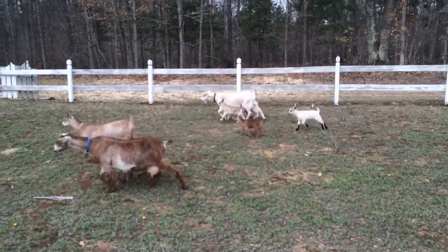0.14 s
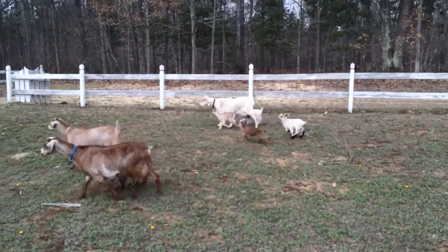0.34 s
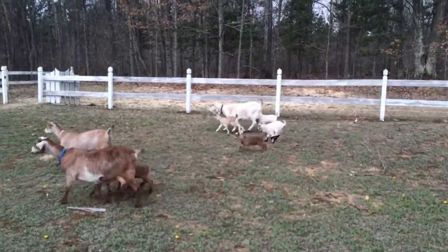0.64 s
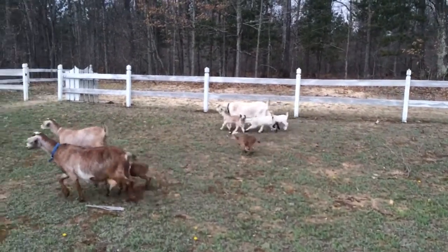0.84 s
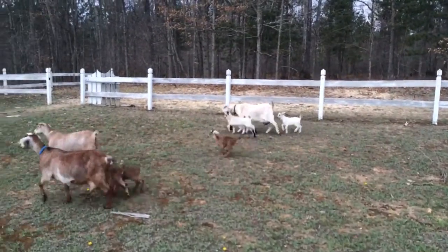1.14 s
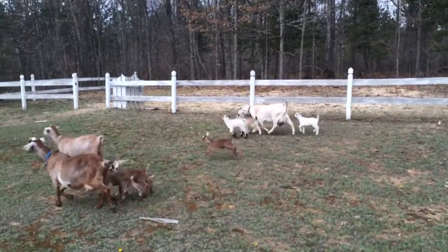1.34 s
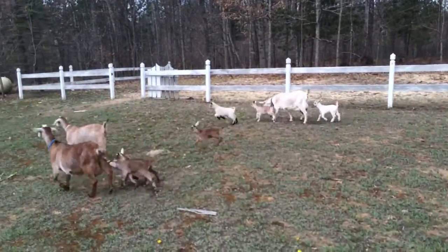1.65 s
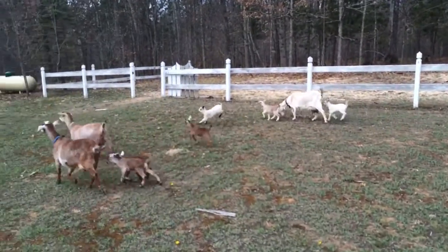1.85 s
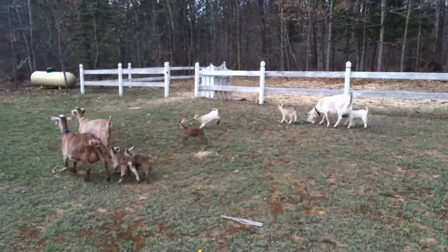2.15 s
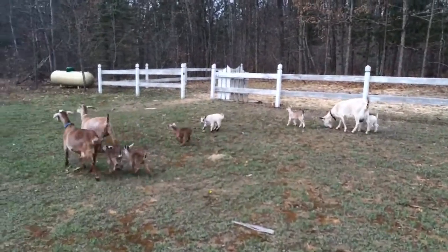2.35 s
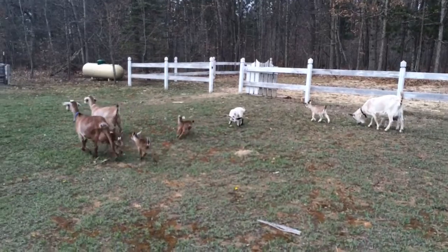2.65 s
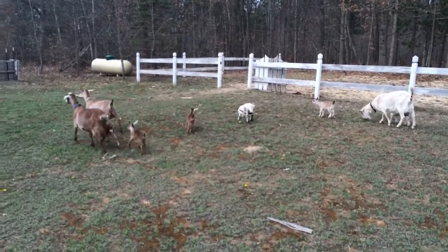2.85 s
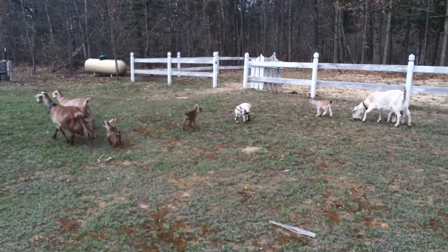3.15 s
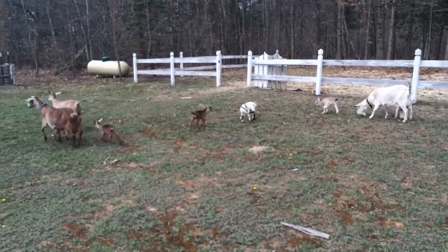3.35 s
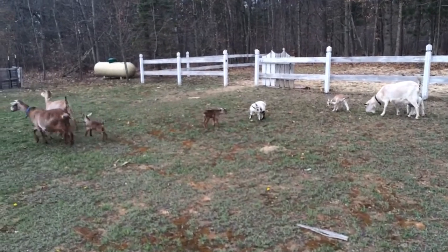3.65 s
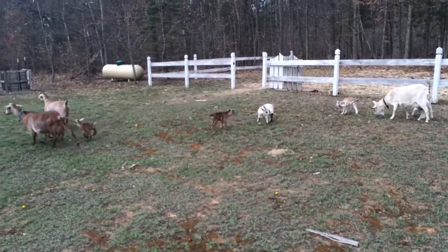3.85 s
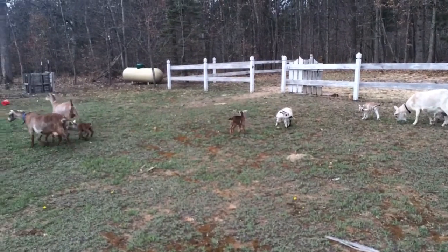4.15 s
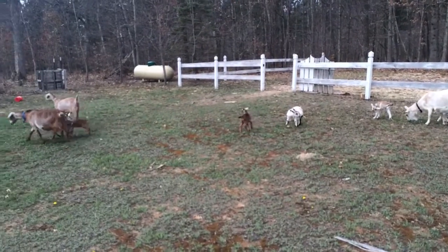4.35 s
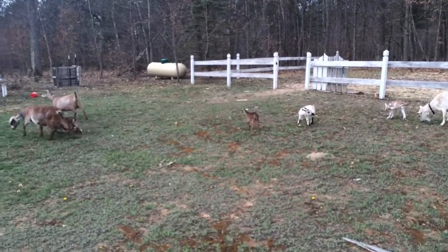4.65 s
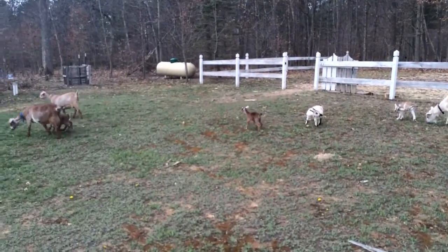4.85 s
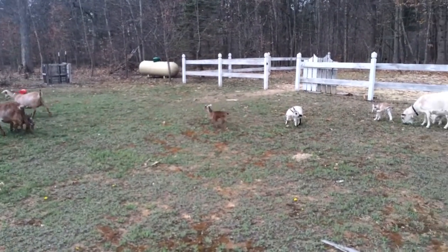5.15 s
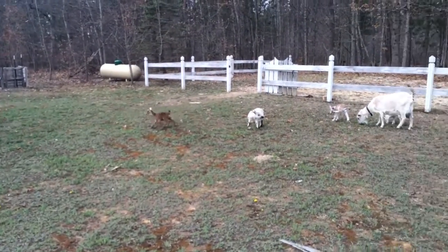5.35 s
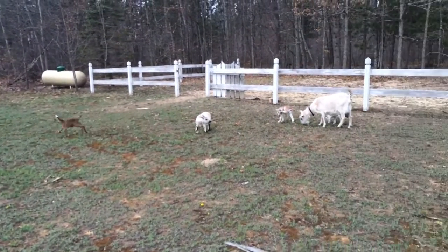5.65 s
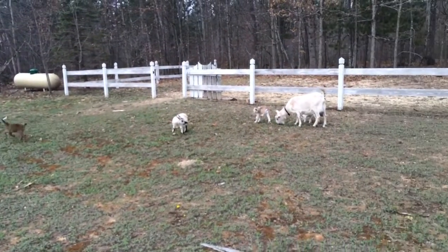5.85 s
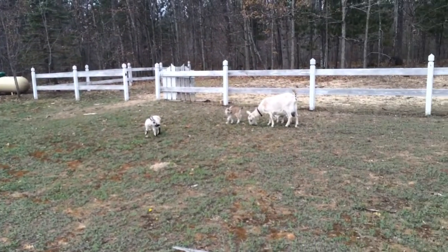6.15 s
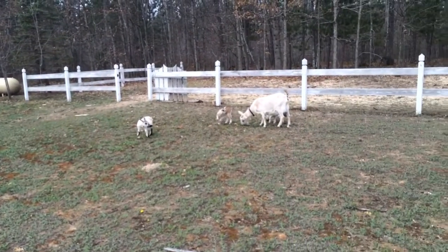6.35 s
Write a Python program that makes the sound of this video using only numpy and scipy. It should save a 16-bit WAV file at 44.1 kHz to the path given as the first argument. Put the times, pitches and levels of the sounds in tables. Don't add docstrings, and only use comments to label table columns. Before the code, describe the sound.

In an open grassy yard by a fence and bare woods, one goat kid gives seven nasal, buzzing bleats, from hoarse single syllables to a long fast train of eight. Other kids answer softly near the start and middle. Wind thumps and rumbles on the handheld microphone mostly in the first two and a half seconds, then calms. Hooves tick in dry grass over faint hiss; the trees return a thin echo.

```python
import sys
import numpy as np
from scipy import signal
from scipy.io import wavfile
from scipy.ndimage import uniform_filter1d

SR = 44100
rng = np.random.default_rng(int(sys.argv[2]) if len(sys.argv) > 2 else 0)


def volts_from_decibels(level):
    exponent = np.asarray(level, float) / 20
    return 10 ** exponent


def bounce(signal):
    frames = np.transpose(np.atleast_2d(signal))
    limited = np.clip(frames, -1, 1)
    pcm = np.round(limited * 32767).astype(np.int16)
    wavfile.write(sys.argv[1], SR, pcm)


N = 286209

# f/Hz, level/dB per Hz
AIR_SPECTRUM = [(40, -13.5), (70, -3.5), (150, -12), (600, -10.5), (2000, -21.5), (7000, -27),
                (13000, -33.5), (15500, -33)]
# t/s, rumble level/dB
WIND_LEVEL = [(0, -53), (.27, -57), (.42, -44.5), (.53, -61), (.85, -48.5), (1.0, -48), (1.12, -41),
              (1.45, -35.5), (1.72, -40), (1.92, -46.5), (2.23, -50.5), (2.5, -45), (2.98, -56.5),
              (3.2, -69), (4.02, -58), (4.2, -69.5), (6.2, -64), (6.4, -42.5)]
# f/Hz, level/dB per Hz
RUMBLE_SPECTRUM = [(20, -31.5), (38, -0.5), (70, 15), (120, -4.5), (180, 0), (300, -36.5), (600, -81.5)]
# f/Hz, level/dB per Hz
FLUTTER_SPECTRUM = [(80, -70), (150, 3), (220, 1), (500, -8.5), (800, -22.5), (1200, -38.5), (2500, -51)]
# t/s, peak level/dB, swing f/Hz
EDDIES = [(0.198, -31, 150), (0.36, -32, 95), (0.591, -17, 136), (0.7, -24, 128), (0.76, -25, 112),
          (0.921, -27, 112), (1.062, -19, 99), (1.094, -28, 250), (1.151, -25, 310), (1.174, -19.5, 297),
          (1.227, -25, 124), (1.272, -25.5, 110), (1.326, -25.5, 110), (1.377, -26.5, 173),
          (1.437, -25.5, 185), (1.565, -18.5, 173), (1.579, -24, 230), (1.653, -36.5, 114),
          (1.895, -34.5, 154), (1.974, -26, 144), (2.03, -13, 159.6), (2.115, -24.5, 121),
          (2.161, -18, 184), (2.313, -28.5, 101), (2.599, -21.5, 186), (4.111, -31, 100),
          (5.278, -37.5, 80), (5.79, -48, 61), (6.287, -23, 166), (6.315, -18, 90)]
# start t/s, length t/s, level/dB, first pitch f/Hz, last pitch f/Hz
HUMS = [
    (0.029, 0.062, -51.5, 458, 696),
    (0.872, 0.064, -58.5, 494, 597),
    (1.877, .055, -55.5, 436, 600),
    (3.543, 0.055, -56.5, 440, 603),
]
# f/Hz, fading t/s
ECHO_FADE = [(500, 0.43), (1800, 0.85), (4000, 0.71), (7500, 0.57), (12000, 1)]
# f/Hz, width f/Hz, level/dB
KID_THROAT = [(660, 530, -31), (1710.6, 157, 14.5), (4030, 580, -5.5), (6050, 1610, -5.5), (7190, 1510, -2),
              (10700, 3600, -28)]
# f/Hz, width f/Hz, level/dB
OTHER_THROAT = [(644, 460, -8.5), (1355, 36, 18), (1840, 91, 14), (3370, 3400, -0.5), (5470, 2150, 1),
                (7670, 1100, 6), (9700, 2600, -1)]
# start t/s, hoarseness 0-1, tiring per s, mouth opening (factor on upper throat f)
BLEATS = [
    (.09, .12, .4, 1.03),
    (.9, .25, 0, 1.06),
    (1.57, .22, 0, 1.04),
    (2.19, .12, 0, 1),
    (3.35, .05, .1, .96),
    (4.43, .03, .42, 1),
    (5.81, .04, .2, 1.03),
]
# resting pitch f/Hz, lower over upper voice level/dB, topmost partials level/dB
BLEAT_VOICES = [(575, 1, 7.5), (578, 1, 9.5), (546, 3.5, 7), (562, 1.5, 6), (590, 4.5, 9),
                (583.5, 5.5, 5.5), (590, 2, 1.5)]
# peak t/s, length t/s, effort level/dB, pitch f/Hz, lower over upper level/dB
SNAPS = [
    (0.104, 0.032, -36, 566, -12.5),
    (0.914, 0.043, -30, 578, -19.5),
    (1.592, 0.044, -31.5, 565.5, -18.5),
    (3.361, 0.0205, -44.5, 605, -18),
    (4.445, 0.023, -41, 572, 1),
]
# peak t/s, effort level/dB, top pitch f/Hz, climb t/s, drop t/s
ARCHES = [(.198, -23.5, 628, .017, 0.0099), (.316, -30.5, 590, 0.016, 0.008),
          (1.013, -26, 647, 0.025, 0.0093), (1.691, -29, 583, .021, 0.012),
          (2.276, -28, 628, 0.0174, 0.0097), (2.385, -32.5, 604, 0.014, 0.018),
          (3.443, -27, 637, 0.021, 0.016), (3.539, -25.5, 647.5, 0.029, 0.014),
          (3.641, -25, 667, 0.024, 0.012), (4.538, -28, 641, 0.017, 0.015),
          (4.639, -26, 665.5, 0.022, 0.013), (4.747, -26.5, 671.6, 0.025, 0.013),
          (4.857, -28.5, 661, .02, .02), (4.984, -30.5, 640, 0.022, 0.0076),
          (5.086, -29, 673, 0.029, 0.015), (5.201, -29.5, 655, 0.026, 0.0097),
          (5.307, -27.5, 691, 0.028, 0.02), (5.94, -30, 641, 0.019, 0.016),
          (6.04, -31.5, 645, 0.016, 0.013)]
# peak t/s, tail t/s, effort level/dB, pitch f/Hz, lower over upper level/dB
ANSWERS = [
    (.166, .006, -37.5, 678, -11.5),
    (.268, 0.037, -35, 676, -21),
    (3.685, 0.067, -38, 671, -6),
    (3.786, 0.034, -38.5, 684, -9),
    (3.838, 0.057, -54.5, 610, -2),
    (3.905, 0.028, -40.5, 624, -7.5),
]
# t/s, peak level/dB
HOOF_TICKS = [(0.6432, -38), (0.6766, -40), (0.7502, -47), (0.7693, -42), (0.819, -44), (1.0994, -51),
              (1.155, -59), (1.1896, -41), (1.276, -45), (1.3463, -44.5), (1.3734, -60), (1.4273, -42.5),
              (2.5924, -54), (2.684, -52), (2.7893, -43.5), (3.1465, -48), (3.2016, -51), (3.233, -43),
              (3.2505, -43), (3.2644, -42), (4.1392, -38), (4.355, -40.5), (4.4069, -51.5)]
# start t/s, length t/s, effort level/dB, first pitch f/Hz, last pitch f/Hz
SQUEAKS = [
    (0.878, 0.033, -59, 498, 575),
    (1.56, 0.024, -55, 511, 604),
    (1.898, .048, -64, 522, 610),
    (2.151, 0.05, -52, 481, 576),
    (3.326, .033, -58, 486, 580),
    (5.794, 0.019, -66, 490, 558),
]
# start t/s, length t/s, effort level/dB, pitch f/Hz, lower over upper level/dB
HOLDS = [
    (2.201, 0.045, -48, 562, -34),
    (5.831, .075, -40, 571, -21),
]

MURMUR_OUT_DB = -50


def evened(x):
    return x / np.sqrt(np.mean(x ** 2) + 1e-20)


def read(points, hz):
    f, value = np.transpose(points)
    return np.interp(np.log(hz + 1), np.log(f + 1), value)


def add(mix, s, sound):
    part = mix[max(round(s * SR), 0):][:len(sound)]
    part += sound[:len(part)]


def coloured(spectrum, patchy_db):
    hz = np.fft.rfftfreq(1024, 1 / SR)
    a, b, patches = rng.standard_normal((3, len(hz), N // 256 + 5))
    patches = uniform_filter1d(patches, size=10, axis=0)
    patches = evened(uniform_filter1d(patches, size=10, axis=1))
    z = (a + 1j * b) * volts_from_decibels(read(spectrum, hz)[:, None] + patchy_db * patches)
    return evened(signal.istft(z, nperseg=1024, noverlap=768)[1][:N])


def wobble(length, hz):
    return evened(signal.lfilter(*signal.butter(2, hz, fs=SR), rng.standard_normal(length)))


def air():
    return volts_from_decibels(-62.5) * coloured(AIR_SPECTRUM, patchy_db=1.85)


def wind():
    t = np.arange(N) / SR
    lumps = 2.15 * np.tanh(wobble(N, 28.5) / 2.55)
    level_db = np.interp(t, *np.transpose(WIND_LEVEL))
    rise_db_per_s, fall_db_per_s = 417, 203
    for s, db, hz in EDDIES:
        swell_db = db - 17 - 4.2 * np.log2(hz / 130)
        slope_db = np.maximum(rise_db_per_s * (s - t), fall_db_per_s * (t - s))
        level_db = np.maximum(level_db, swell_db - slope_db)
    flutter = coloured(FLUTTER_SPECTRUM, patchy_db=3.0)
    swings, bursts = np.zeros((2, N))
    u = np.arange(-1323, 1764) / SR
    for (s, db, hz), turn in zip(EDDIES, rng.random(len(EDDIES))):
        start = s + u[0]
        swing = np.exp(-(u * hz / 0.6) ** 2) * np.sin(2 * np.pi * (hz * u + turn))
        add(swings, start, volts_from_decibels(db - 1.0) * swing)
        faster = np.exp(-(u * hz / 0.86) ** 2) * np.sin(2 * np.pi * (1.817 * hz * u + 7 * turn))
        add(swings, start, volts_from_decibels(db - 11.5) * (hz / 200) ** 1.94 * faster)
        add(bursts, start, volts_from_decibels(db - 13.5) * (hz / 200) ** 2.12 * np.exp(-(u / 0.015) ** 2))
    rumble = volts_from_decibels(level_db + 1.0 + 6.8 * lumps) * coloured(RUMBLE_SPECTRUM, patchy_db=4.0)
    flutter_gain = volts_from_decibels(level_db - 16.0 + 3.1 * lumps) + bursts
    return rumble + swings + flutter_gain * flutter


def hum(rows):
    s, hz, db = np.transpose(rows)
    t = np.arange(s[0], s[-1], 1 / SR)
    phase = 2 * np.pi * np.cumsum(np.interp(t, s, hz)) / SR
    leak = sum(wobble(len(t), 120) * np.sin(k * phase) for k in range(8, 15))
    tone = np.sin(phase) + volts_from_decibels(-16) * np.sin(2 * phase) + volts_from_decibels(-21) * leak
    level = np.sqrt(2) * volts_from_decibels(np.interp(t, s, db))
    return s[0], level * tone * signal.windows.tukey(len(t), .2)


def hums():
    out = np.zeros(N)
    shape = ((0, 0.046, -4), (.3, .33, 0), (.62, .72, 0), (1, 0.97, -1))
    for s, length, db, first_hz, last_hz in HUMS:
        rise_hz = last_hz - first_hz
        add(out, *hum([(s + u * length, first_hz + g * rise_hz, db + d) for u, g, d in shape]))
    return out


def yard_echo(x):
    taps = np.zeros(SR)
    at = np.arange(300, SR - 20, 20) + rng.integers(0, 20, (SR - 301) // 20)
    taps[at] = rng.choice([-1., 1.], at.shape)
    hz, t, z = signal.stft(taps, SR, nperseg=256)
    near = volts_from_decibels(8.5 - 60 * t / 0.13)
    wood_edge = volts_from_decibels(-12.5) * np.exp(-((t - .085) / 0.052) ** 2)
    fading = volts_from_decibels(-60 * t / read(ECHO_FADE, hz)[:, None])
    colour = volts_from_decibels(3.25 * np.log2((hz[:, None] + 50) / 5000).clip(-3, 0))
    tail = signal.istft(z * colour * (near + wood_edge + fading), SR, nperseg=256)[1]
    stirred = x * (.45 + .9 * wobble(N, 170))
    return signal.fftconvolve(stirred, tail / np.linalg.norm(tail))[:N]


def syllable(rows, throat, jitter, hoarse, mouth, top_db):
    s, *columns = np.transpose(rows)
    t = np.arange(s[0] - .007, s[-1] + 0.026, 1 / SR)
    upper_db, hz, lower_db = (uniform_filter1d(np.interp(t, s, c), size=400) for c in columns)
    k = np.arange(1, 27)[:, None]
    partial_hz = k * hz

    power = 0
    for f, width, db in throat:
        centre = f * (mouth if f > 5000 else 1)
        power = power + volts_from_decibels(2 * db) / (1 + (2 * (partial_hz - centre) / width) ** 2) ** 2.03
    ground_s = rng.uniform(.0006, .0011)
    power = power * (1 + .4 * np.cos(2 * np.pi * partial_hz * ground_s))
    power = power / (1 + (partial_hz / 12000) ** 8)
    high = np.broadcast_to((k < 2) | (k > 3), power.shape)
    power = power / np.where(high, (power * high).sum(0), (power * ~high).sum(0))
    height = np.sqrt(2 * power) * volts_from_decibels(np.where(high, upper_db, lower_db))
    flicker = evened(uniform_filter1d(rng.standard_normal(height.shape), size=700, axis=1))
    height = height * volts_from_decibels(top_db * (k > 16) + np.minimum(k / 4, 1.9) * flicker - k / 20)

    turns = np.cumsum(hz * (1 + jitter * wobble(len(t), 82))) / SR
    closing = np.clip(-np.gradient(upper_db) * SR / 700, 0, 1)
    strain = volts_from_decibels(.5 * (upper_db - upper_db.max()))
    leap = np.clip((abs(np.gradient(hz)) * SR - 3600) / 4500, 0, 1)
    rough = .07 + 1.4 * hoarse * strain + .3 * closing + .55 * (1 - strain) ** 2 + leap
    smear = np.clip(rough * np.minimum(k, 13) / 11, 0, .95)
    breath = signal.lfilter(*signal.butter(2, 320, fs=SR), rng.standard_normal((2, len(k), len(t))))
    a, b = evened(breath) / np.sqrt(2)
    phase = 2 * np.pi * k * turns + .11 * k ** 2
    voice = height * ((np.sqrt(1 - smear ** 2) + smear * a) * np.cos(phase) + smear * b * np.sin(phase))
    return t[0], voice.sum(0) * signal.windows.tukey(len(t), 1100 / len(t))


def snap(peak, length, db, hz, lower_db):
    left_db = MURMUR_OUT_DB + 0.43 * (db - MURMUR_OUT_DB)
    return [(peak - .008, MURMUR_OUT_DB, 1.01 * hz, MURMUR_OUT_DB + 2 * lower_db - 26),
            (peak, db, hz, db + lower_db),
            (peak + 0.435 * length, left_db, hz, left_db + 0.74 * lower_db),
            (peak + length, MURMUR_OUT_DB, .93 * hz, MURMUR_OUT_DB - 7)]


def bleats():
    out, starts = np.zeros(N), [row[0] for row in BLEATS]
    openings = [snap(*row) for row in SNAPS] + [hold(*row) for row in HOLDS]
    openings = sorted(openings, reverse=True)
    for row, later in zip(ARCHES, ARCHES[1:] + [(N,)]):
        call = np.searchsorted(starts, row[0]) - 1
        start, hoarse, tiring, mouth = BLEATS[call]
        rest_hz, lower_db, top_db = BLEAT_VOICES[call]
        tired = tiring * (row[0] - start)
        rows = arch(*row, rest_hz, lower_db, tired)
        if later[0] - row[0] > .2:
            rows[-1, [1, 3]] += -3.5
        if openings and openings[-1][0][0] < row[0]:
            first = openings.pop()
            rows = np.vstack([first, rows[rows[:, 0] > first[-1][0] + .004]])
        add(out, *syllable(rows, KID_THROAT, jitter=.002, hoarse=hoarse + .55 * tired,
                           mouth=mouth, top_db=top_db))
    return out


def answer(peak, tail, db, hz, lower_db):
    in_db, out_db, glide = -15, -15.5, 0.0134
    return [(peak - .022, db + in_db, hz * (1 - glide), db + in_db + lower_db),
            (peak - .006, db - 4, hz, db + lower_db),
            (peak + 0.326 * tail, db - 2.5, hz * 1.004, db - 5 + lower_db),
            (peak + tail, db + out_db, hz * (1 + glide), db + 1.3 * out_db + lower_db)]


def answers():
    out = np.zeros(N)
    for row in ANSWERS:
        add(out, *syllable(answer(*row), OTHER_THROAT, jitter=.007, hoarse=.13, mouth=1, top_db=0))
    return out


def arch(peak, effort_db, top_hz, climb, drop, rest_hz, lower_db, tired):
    swell_s = climb + .028 + .03 * tired
    die_s = drop + .022 + .03 * tired
    s = peak + np.array([-swell_s, -climb, -climb / 2, 0, drop / 2, drop, die_s])
    up_db, down_db = 365 * climb, 536 * drop
    db = effort_db - np.array([0, up_db, 0.44 * up_db, 0, 0.24 * down_db, down_db, 0])
    db[[0, -1]] = -48.5 + tired, MURMUR_OUT_DB
    jump = min(0.607 + 5.4 * max(tired - 0.174, 0), 1)
    hz = rest_hz + (top_hz - rest_hz) * np.array([0, 0, jump, 1, 0.81, 0, 0])
    slack_in = .94 + (1 - .94) * min(2.03 * tired, 1)
    hz[[0, -1]] *= slack_in, 0.99
    ring_hz, ring_width_hz = KID_THROAT[1][:2]
    ring_db = -17.2 * np.log10(1 + (2 * (3 * hz - ring_hz) / ring_width_hz) ** 2)
    shut_db = [-14.5 * (1 - 2 * tired), 0, 0, 0, 0, 0, -20.5]
    return np.transpose([s, db, hz, db + lower_db + ring_db + shut_db])


def grass():
    u = np.arange(900) / SR
    out = np.zeros(N)
    for s, db in HOOF_TICKS:
        puff, size, hz = rng.standard_normal(900), rng.exponential(1), rng.uniform(6400, 10300)
        crack = uniform_filter1d(puff, size=5) * np.cos(2 * np.pi * hz * u)
        snapping = volts_from_decibels(db + 0.5 - 60 * u / 0.0093) * crack
        crackle = volts_from_decibels(db - 30.5 + 4.13 * size - 60 * u / 0.19) * puff
        add(out, s, snapping + crackle)
    out += volts_from_decibels(-54 + 1.5 * rng.exponential(1, N)) * (rng.random(N) < 25 / SR)
    return signal.lfilter(*signal.butter(2, [2500, 13000], "band", fs=SR), out)


def squeak(start, length, db, first_hz, last_hz):
    rise_hz = last_hz - first_hz
    return [(start + u * length, db + d, first_hz + u * rise_hz, db + d - 14)
            for u, d in ((0, -6), (.45, 0), (1, -4))]


def squeaks():
    out = np.zeros(N)
    for row in SQUEAKS:
        add(out, *syllable(squeak(*row), KID_THROAT, jitter=.004, hoarse=.2, mouth=1, top_db=2))
    return out


def hold(start, length, db, hz, lower_db):
    rows = [(start - .012, db - 11, hz, db + lower_db - 17)]
    for i, s in enumerate(np.arange(0, length, .019)):
        rocking_hz = hz * (1 - 0.014 * (-1) ** i)
        rows.append((start + s, db, rocking_hz, db + lower_db * (1 - 0.89 * s / length)))
    return rows


def scene():
    ground = air() + wind() + grass()
    herd = hums() + bleats() + answers() + squeaks()
    return (volts_from_decibels(0.5) * herd + volts_from_decibels(-16) * yard_echo(herd) + ground)[None]


def roll_off(x):
    return signal.sosfilt(signal.butter(12, 15670, fs=SR, output="sos"), x)


def record(dry):
    no_bass = signal.lfilter(*signal.butter(3, 42, "high", fs=SR), dry)
    treble_edge = signal.firwin(511, 15600, window=("kaiser", 9), fs=SR)
    limited = signal.oaconvolve(no_bass, treble_edge[None], "same")
    return roll_off(limited)


dry = scene()
out = record(dry)
bounce(out)
```